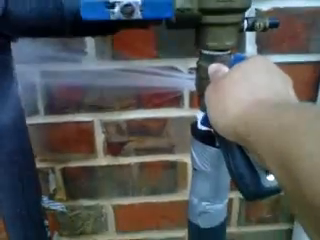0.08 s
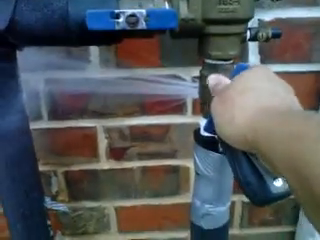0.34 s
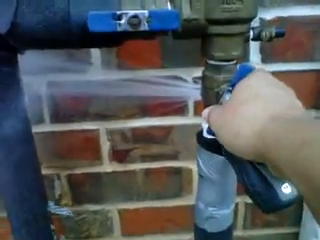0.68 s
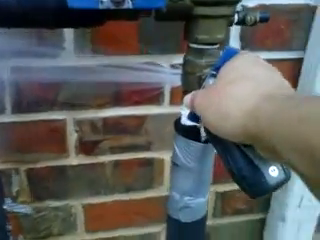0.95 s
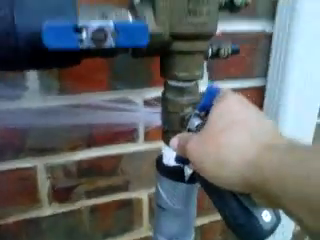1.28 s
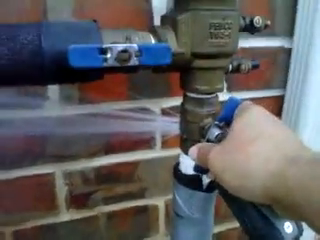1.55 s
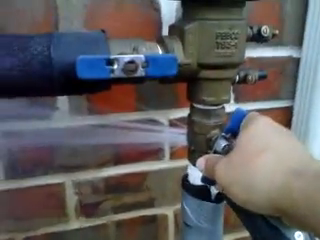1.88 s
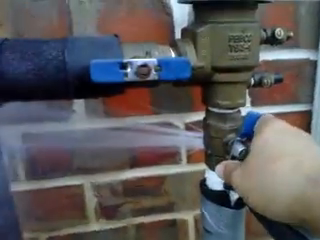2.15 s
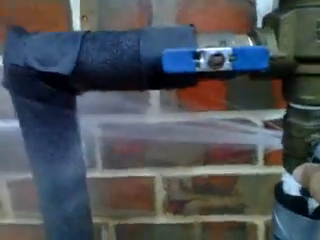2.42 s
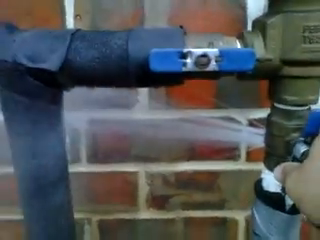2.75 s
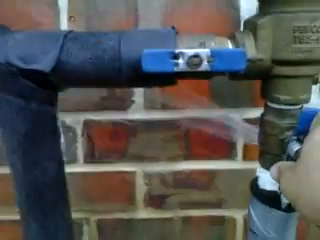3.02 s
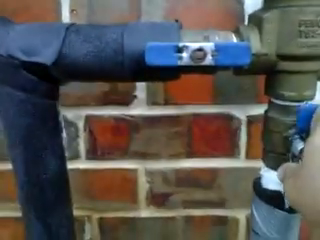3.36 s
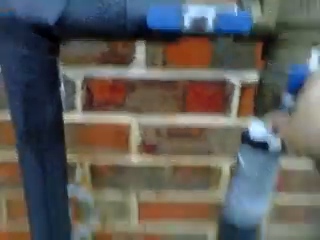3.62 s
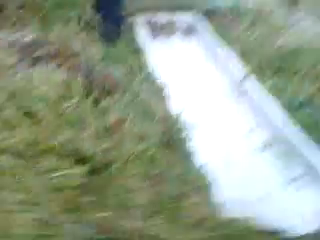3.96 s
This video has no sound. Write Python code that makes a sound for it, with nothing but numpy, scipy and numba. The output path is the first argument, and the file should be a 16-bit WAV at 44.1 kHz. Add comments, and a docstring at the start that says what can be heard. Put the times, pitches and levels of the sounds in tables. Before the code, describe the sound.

A water jet hisses and spatters on brick until shut off, leaving small handling clicks.

```python
"""Outdoors, over a low rumble, water jets from a split pipe fitting and spatters on a brick wall.
Drop impacts and turbulence make a broad hiss; the split resonates, spits and faintly whistles, and
the handle of a ball valve ticks as a hand turns it. At 2.3 s the spray drops to a thinner sizzle,
which swells and is shut off at 3.15 s. The last drops settle, the lever knocks on its stop at 3.5 s,
and at 3.9 s the hand lets go with a click and a rustle."""
import sys
import numpy as np
from scipy import signal
from scipy.fft import rfft, irfft
from scipy.io import wavfile
from scipy.ndimage import uniform_filter1d, map_coordinates
from numba import njit

SR = 44100
rng = np.random.default_rng(int(sys.argv[2]) if len(sys.argv) > 2 else 0)


def unload_wav(signal):
    """Save mono or channel-first audio to the path in sys.argv[1] as 16-bit WAV at rate SR, clipped to [-1, 1]."""
    wavfile.write(
        sys.argv[1],
        SR,
        np.round(np.clip(np.atleast_2d(signal).T, -1, 1) * 32767).astype(np.int16),
    )


N = 176400
T = np.arange(N) / SR
TOP_HZ = 7250

# full spray (time [s], level [dB])
FULL_LEVEL = [(0, -27.5), (.09, -27.5), (.4, -28), (.9, -28.5), (1.2, -27.5), (1.7, -27.5), (2.1, -27.5),
              (2.23, -27), (2.262, -31), (2.3, -43)]
# spectrum of the spray's hiss, with a narrow dip at 4 kHz that is not the water's
# (frequency [Hz], relative density [dB])
FULL_SPECTRUM = [(100, -36), (330, -21.5), (450, -18.5), (560, -9.5), (680, -6.5), (830, -7), (1300, -5),
                 (1750, -3.5), (2000, -2.5), (2400, 0), (3300, -2), (3600, -4.5), (3880, -5.5), (3990, -13),
                 (4100, -6), (4250, -3.5), (4900, -9.5), (5500, -9), (6300, -14), (7100, -19)]
# hissing resonance of the split (time [s], centre [Hz], level against the spray [dB])
SPLIT_RESONANCE = [(0, 2870, -16), (.13, 3100, -8.5), (.27, 3170, -6), (.42, 3100, -9.5), (.55, 3186, -1.5),
                   (.85, 2990, -2.5), (1.08, 3090, -4.5), (1.19, 2980, -3), (1.33, 2740, -5),
                   (1.52, 2670, -0.5), (1.7, 2740, -3), (2.0, 2944, -3.5), (2.22, 2770, -3)]
# fine sizzle above the full spray (time [s], level [dB])
SIZZLE_ENVELOPE = [(0, -44.5), (.5, -40.5), (.9, -40.5), (1.1, -39.5), (1.24, -37), (1.35, -34.5),
                   (1.43, -38), (1.53, -47.5), (2.2, -44.5), (2.3, -59)]
# its spectrum (frequency [Hz], relative density [dB])
SIZZLE_SPECTRUM = [(3000, -21), (4500, -3.5), (5050, -1), (5400, 1), (5830, 3), (6350, 0), (6750, 0.5),
                   (7200, -15)]
# hollow note of the spray on the wall (time [s], level [dB])
HOLLOW_ENVELOPE = [(0, -43), (.4, -43), (1.0, -46), (1.25, -49.5)]
# throttled spray (time [s], level [dB])
THIN_LEVEL = [(2.2, -46), (2.28, -34), (2.35, -32), (2.45, -31.5), (2.6, -30), (2.78, -29), (2.95, -28.5),
              (3.07, -27), (3.128, -29), (3.15, -36), (3.2, -45), (3.245, -52), (3.28, -68)]
# its spectrum (frequency [Hz], relative density [dB])
THIN_SPECTRUM = [(150, -30), (380, -22), (540, -12), (680, -12), (820, -13), (1050, -11), (1500, -9.5),
                 (1650, -11.5), (1900, -5), (2100, -7.5), (2450, -5), (2650, -4), (2950, -3), (3300, -7),
                 (3650, -9.5), (4000, -8), (4200, 0), (4800, -1.5), (5600, -3), (6400, -9), (7100, -14)]
# resonances of the split under the thin jet (centre [Hz], width [Hz], relative level [dB])
THIN_RESONANCES = [(2283, 170, -5.5), (2500, 240, -2.5), (2906, 310, 0)]
# their joint strength (time [s], level [dB])
THIN_RESONANCE_LEVEL = [(2.25, -46), (2.33, -53), (2.48, -36.5), (2.6, -39.5), (2.72, -33), (2.92, -35),
                        (3.05, -29.5), (3.135, -34.5), (3.165, -53), (3.25, -49)]
# whistle at the lip of the split (time [s], pitch [Hz], level against the spray [dB])
EDGE_TONE = [(0, 2933, -20), (.07, 2900, -6), (.12, 2956, 0), (.165, 2994, -8.5), (.22, 3190, -4.5),
             (.28, 3240, -6), (.4, 3175, -10), (.65, 3182, -14), (.85, 3160, -6), (1.04, 3150, -8.5),
             (1.12, 3028, -15), (1.18, 2786, -1), (1.23, 2726, -5.5), (1.29, 2610, -1.5), (1.36, 2546, -10),
             (1.55, 2455, -13), (2.2, 2398, -16.5)]
# spits from the split (time [s], peak [dB], pitch [Hz], length [s], pitch fall [octaves])
SPIT_CHIRPS = [(.4952, -14.5, 5900, 0.00194, 0.53), (2.153, -21, 3000, 0.0029, .1),
               (2.222, -22, 2700, 0.0085, 0.18), (2.828, -22.5, 3100, 0.014, 0.32),
               (3.043, -22, 4800, 0.0063, 0.16), (3.123, -22, 2900, 0.0062, 0.13)]
# last drops on the wall (frequency [Hz], relative density [dB])
DRIZZLE_SPECTRUM = [(250, -25), (650, 2.5), (1500, 0), (3100, 3), (3800, -5), (4600, -13.5), (5600, -6),
                    (7000, -18.5)]
# modes of the ticking handle (frequency [Hz], relative level [dB], t60 [s])
HANDLE_MODES = [(4450, 5, 0.039), (5300, -1, 0.034), (5870, 0, 0.031), (6500, -9, 0.016)]
# grating just before the stop (time [s], length [s], level [dB])
LEVER_GRATES = [(3.432, .013, -53), (3.443, 0.015, -51)]
# knocks against the stop (time [s], peak of the ringing [dB])
LEVER_KNOCKS = [(3.5073, -34), (3.51, -37.5)]
# modes of the knocked lever (frequency [Hz], relative level [dB], t60 [s])
KNOCK_MODES = [(627, -6, 0.035), (800, -3, 0.033), (950, 3, 0.071), (1050, -1, .035), (1420, -11, .035),
               (2030, -17, .025), (2750, -6, .025), (3080, -10, .025), (5000, -8, .015), (6740, -13, .01)]
# scrape of each contact (frequency [Hz], relative density [dB])
GRIT_SPECTRUM = [(300, -12), (600, 3), (1000, 2), (1500, 2), (2200, -8), (2850, -3), (3800, -19),
                 (5000, -17), (7000, -24)]
# click of the hand letting go (frequency [Hz], relative density [dB])
CLICK_SPECTRUM = [(300, -11), (1000, -15), (1600, -10), (2100, -18), (3400, -5), (4000, -12), (4450, -3),
                  (5200, -10), (5850, 3), (6200, -4), (6600, 1), (7200, -8)]
# sliding grip (time [s], level [dB])
SLIDE_LEVEL = [(3.888, -84), (3.895, -35), (3.903, -43.5), (3.92, -41.5), (3.938, -39.5), (3.949, -39),
               (3.965, -42.5), (4.0, -42.5)]
# its spectrum (frequency [Hz], relative density [dB])
SLIDE_SPECTRUM = [(80, 2), (300, -10.5), (900, -19.5), (1300, -13.5), (2400, -12.5), (3000, -11),
                  (3500, -2), (4000, -4), (4330, 4), (4700, -2.5), (5400, -5), (5800, -14), (6500, -10.5),
                  (7100, -17)]
# its brief catches (time [s], length [s], level [dB])
SLIDE_CATCHES = [(3.946, 0.0048, -39.5), (3.9523, .0016, -32), (3.958, .002, -37)]
# wind and grip rumble on the swinging microphone (time [s], level [dB])
SWING_ENVELOPE = [(3.55, -67), (3.75, -57), (3.88, -66), (4.0, -51)]
# its spectrum (frequency [Hz], relative density [dB])
SWING_SPECTRUM = [(22, -11), (50, 1), (120, 0), (260, -23), (600, -37), (3000, -62)]
# reflections off the hand and the wall (delay [s], gain [dB])
NEAR_ECHOES = [(.00168, -25.5), (.0029, -19), (.0044, -21.5), (.0071, -18)]
# outdoor background (frequency [Hz], relative density [dB])
OUTDOOR_SPECTRUM = [(20, -15), (45, -3.5), (75, 0), (115, -0.5), (170, -9), (260, -11), (420, -15.5),
                    (750, -15.5), (1000, -17.5), (1500, -20), (3000, -21.5), (3900, -28), (4600, -25),
                    (5300, -32.5), (7000, -35.5)]


def full_jet():
    """Turbulence drives a wandering resonance of the split, over spatter, sizzle and a hollow note."""
    centre_hz = curve(SPLIT_RESONANCE) * (1 + 0.039 * walk(160))
    band = hiss_band(centre_hz, width_hz=750)
    split = unit(band * undb(-0.1 * walk(170))) * undb(curve(SPLIT_RESONANCE, column=2))
    sizzle = colour(spray(), SIZZLE_SPECTRUM) * envelope(SIZZLE_ENVELOPE)
    hollow = hiss_band(1730, width_hz=170) * envelope(HOLLOW_ENVELOPE)
    spatter = colour(spray(), FULL_SPECTRUM)
    return (spatter + split) * envelope(FULL_LEVEL) + sizzle + hollow


def thin_jet():
    """Throttling leaves a brighter spray; its turbulence excites three fixed resonances of the split."""
    ringing = unit(sum(undb(db) * hiss_band(hz, width) for hz, width, db in THIN_RESONANCES))
    spatter = colour(spray(), THIN_SPECTRUM)
    return spatter * envelope(THIN_LEVEL) + ringing * envelope(THIN_RESONANCE_LEVEL)


def spray(sputter_hz=78, sputter_db=0.5):
    """Jet break-up modulates the amplitude of dense drop impacts and a hiss of mist."""
    drops_and_mist = impacts(per_s=6500, spread_db=1) + noise()
    return flicker(drops_and_mist, sputter_hz) * undb(sputter_db * walk(sputter_hz))


def whistle(jitter=0.024, flutter_db=4.5):
    """An edge tone at the lip of the split glides up and then down as the valve turns."""
    hz = curve(EDGE_TONE) * (1 + jitter * walk(450))
    tone = sine(hz) * undb(flutter_db * np.tanh(walk(220)))
    return unit(tone) * undb(curve(EDGE_TONE, column=2)) * envelope(FULL_LEVEL)


def spits():
    """Air pockets escape through the split, each a short chirp of falling frequency."""
    out = np.zeros(N)
    for start, db, hz, length, octaves in SPIT_CHIRPS:
        progress = np.clip((T - start) / length, 0, 1)
        pitch = hz * 2 ** (-octaves * progress) * (1 + 0.045 * walk(1500))
        out += undb(db) * np.sqrt(burst(start, length)) * sine(pitch)
    return out


def drizzle(shut_s=3.146, rise_s=0.056, fall_db_per_s=40):
    """Sparser impacts on the wall decay exponentially once the jet has stopped."""
    age = T - shut_s
    gain = np.clip(age / rise_s, 0, 1) * undb(-49 - fall_db_per_s * age)
    patter = impacts(per_s=900, spread_db=4.1) + undb(-1.5) * noise()
    return colour(patter, DRIZZLE_SPECTRUM) * gain


def lever(tick_s=0.45, contact_s=0.005):
    """Impacts excite metal modes and friction makes noise: a tick, then grating and knocks at the stop."""
    tick = undb(-22.5) * ring(tick_s, HANDLE_MODES)
    out = tick + colour(noise(), GRIT_SPECTRUM) * bursts(LEVER_GRATES)
    for start, db in LEVER_KNOCKS:
        age = np.clip(T - start, 0, .5)
        grit = colour(noise(), GRIT_SPECTRUM) * (age > 0) * np.exp(-age / contact_s)
        out += undb(db) * (ring(start, KNOCK_MODES) + undb(-8.5) * grit)
    return out


def hand_release():
    """Stick-slip friction: the hand lets go with a click, then slides and briefly catches."""
    click = colour(noise(), CLICK_SPECTRUM) * burst(start=3.8904, length=0.0045) * undb(-27.7)
    grains = impacts(per_s=2500, spread_db=2.5) + undb(5.5) * noise()
    friction = envelope(SLIDE_LEVEL) + bursts(SLIDE_CATCHES)
    return click + colour(grains, SLIDE_SPECTRUM) * friction


def reflect(x, sway_hz=1.5):
    """Interference with near echoes makes a comb filter, which shifts as the microphone sways."""
    path_scale = 1 + 0.05 * walk(sway_hz)
    return x + sum(undb(db) * map_coordinates(x, [(T - delay * path_scale) * SR], order=1, mode="mirror")
                   for delay, db in NEAR_ECHOES)


def swing_rumble():
    """Wind and grip vibration make low-frequency noise as the microphone swings away."""
    return colour(noise(), SWING_SPECTRUM) * envelope(SWING_ENVELOPE)


def outdoors(hum_hz=222.3):
    """Broadband rumble lies under the faint, wavering tone of a far machine."""
    hum = np.sqrt(2) * sine(hum_hz * (1 + 0.0019 * walk(7.2)))
    rumble = undb(-55.5) * colour(noise(), OUTDOOR_SPECTRUM)
    return rumble + undb(-68 + 0.57 * walk(6)) * hum


def impacts(per_s, spread_db):
    """Shot noise: random impulses, many small and a few large, at rms 1."""
    size = undb(spread_db * np.minimum(rng.exponential(size=N), 5))
    return unit((rng.random(N) < per_s / SR) * size * np.sign(noise()))


def flicker(x, rate_hz, depth_db=1.03, bands=9):
    """Independent amplitude modulation of overlapping frequency bands."""
    freqs, spectrum = np.arange(N // 2 + 1) * SR / N, rfft(x)
    place = np.minimum(freqs / TOP_HZ, 1) * (bands - 1)
    windows = (np.maximum(1 - abs(place - k), 0) for k in range(bands))
    return sum(irfft(spectrum * window, N) * undb(depth_db * walk(rate_hz)) for window in windows)


def hiss_band(hz, width_hz):
    """Forced resonance: noise through two resonators in series, each width_hz wide, at rms 1."""
    hz, width_hz = hz * np.ones(N), float(width_hz)
    return unit(resonate(resonate(noise(), hz, width_hz), hz, width_hz))


@njit
def resonate(x, hz, width_hz):
    """A damped second-order resonator passes a band around a moving centre."""
    out, band_state, low_state = np.empty(len(x)), 0., 0.
    for i in range(len(x)):
        step, damping = np.tan(np.pi * hz[i] / SR), width_hz / hz[i]
        band = (band_state + step * (x[i] - low_state)) / (1 + step * (step + damping))
        band_state = 2 * band - band_state
        low_state += 2 * step * band
        out[i] = damping * band
    return out


def ring(start, modes):
    """Free vibration: exponentially damped modes of alternating sign, at peak 1."""
    age = np.clip(T - start, 0, .5)
    out = sum((-1) ** k * undb(db - 60 * age / t60) * np.sin(2 * np.pi * hz * age)
              for k, (hz, db, t60) in enumerate(modes))
    return out / abs(out).max()


def colour(x, rows):
    """Spectral shaping by (frequency [Hz], level [dB]) rows, rolled off at both ends, at rms 1."""
    hz, db = np.array(rows).T
    freqs = np.maximum(np.arange(N // 2 + 1) * SR / N, 1)
    gain = undb(np.interp(np.log(freqs), np.log(hz), db))
    roll_off = np.minimum(freqs / hz[0], 1) / np.sqrt(1 + (freqs / TOP_HZ) ** 60)
    return unit(irfft(rfft(x) * gain * roll_off, N))


def envelope(rows, fade_db_per_s=500):
    """Gain from (time [s], level [dB]) rows, decaying exponentially outside them."""
    outside_s = np.maximum(rows[0][0] - T, 0) + np.maximum(T - rows[-1][0], 0)
    return undb(curve(rows) - fade_db_per_s * outside_s)


def curve(rows, column=1):
    """Linear interpolation of one column over time."""
    rows = np.array(rows)
    return np.interp(T, rows[:, 0], rows[:, column])


def bursts(rows):
    """A sum of half-sine gain pulses."""
    return sum(undb(db) * burst(start, length) for start, length, db in rows)


def burst(start, length):
    """A half-sine pulse, timed in seconds."""
    return np.sin(np.pi * np.clip((T - start) / length, 0, 1))


def sine(hz):
    """An oscillator whose phase is the integral of frequency."""
    return np.sin(2 * np.pi * np.cumsum(hz) / SR)


def walk(rate_hz):
    """Low-passed noise: smooth random motion at rms 1."""
    span = max(int(SR / rate_hz), 1)
    return unit(uniform_filter1d(uniform_filter1d(noise(), span), span))


def noise():
    """White Gaussian noise."""
    return rng.standard_normal(N)


def unit(x):
    """Normalisation to rms 1."""
    return x / np.sqrt(np.mean(x ** 2))


def undb(db):
    """Decibels to amplitude ratio."""
    return 10 ** (np.asarray(db) / 20)


def scene():
    """Superposition: all sources add at one microphone, which feeds both channels."""
    water = reflect(full_jet() + thin_jet()) + whistle() + spits() + drizzle()
    mono = water + swing_rumble() + lever() + hand_release() + outdoors()
    return np.array([mono, mono])


def record(dry):
    """Band limiting: a steep elliptic low-pass removes the treble above TOP_HZ."""
    return signal.sosfilt(signal.ellip(10, .2, 80, TOP_HZ, fs=SR, output="sos"), dry)


dry = scene()
out = record(dry)
unload_wav(out)
```